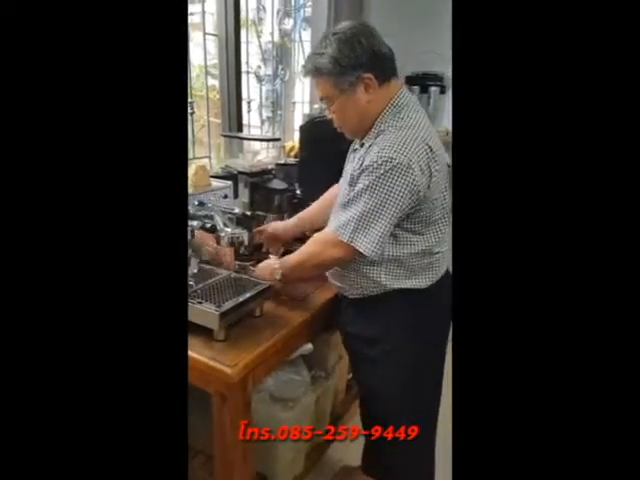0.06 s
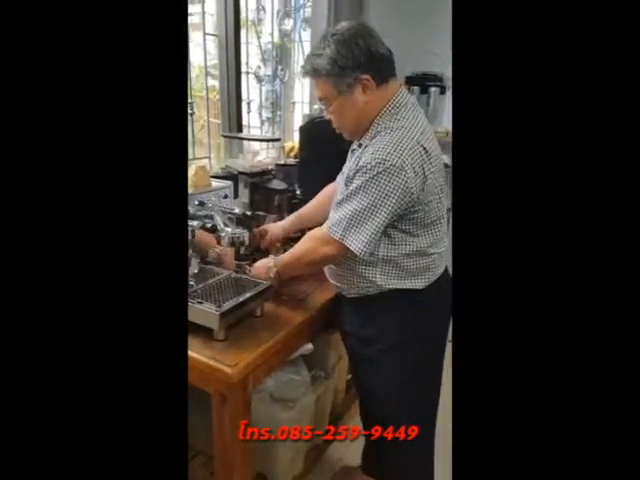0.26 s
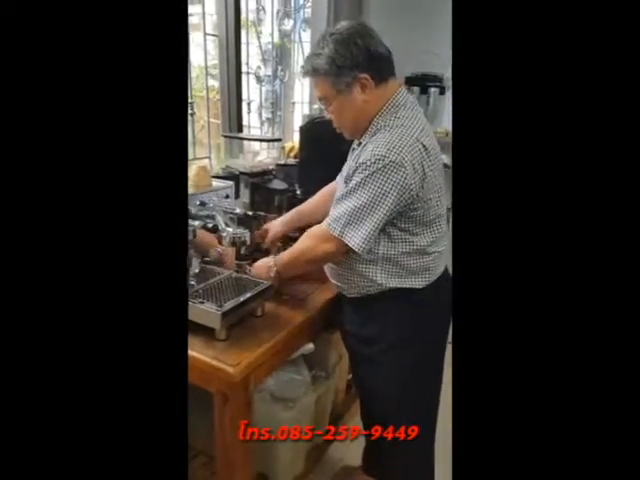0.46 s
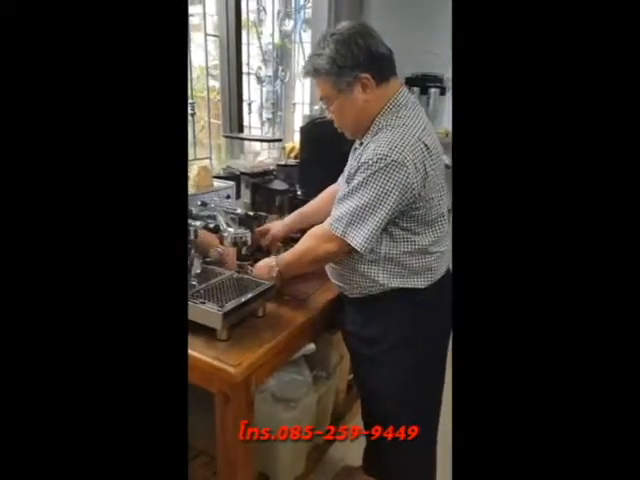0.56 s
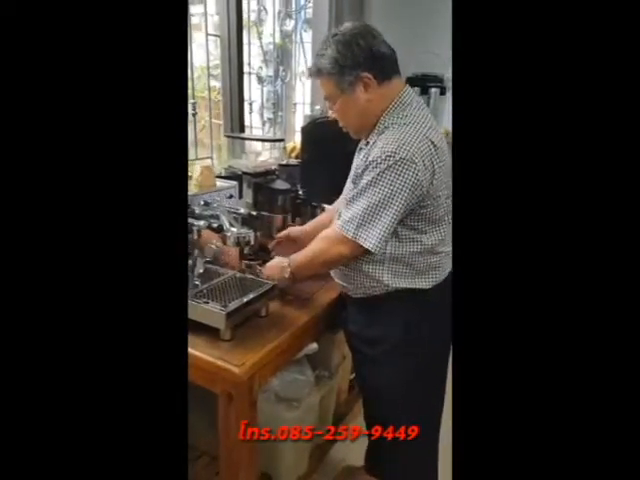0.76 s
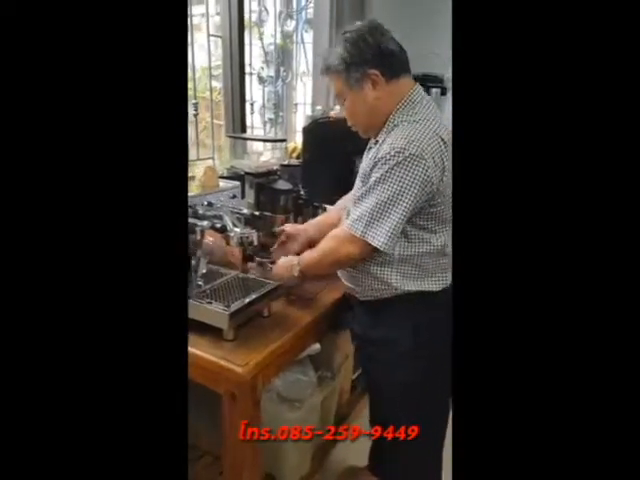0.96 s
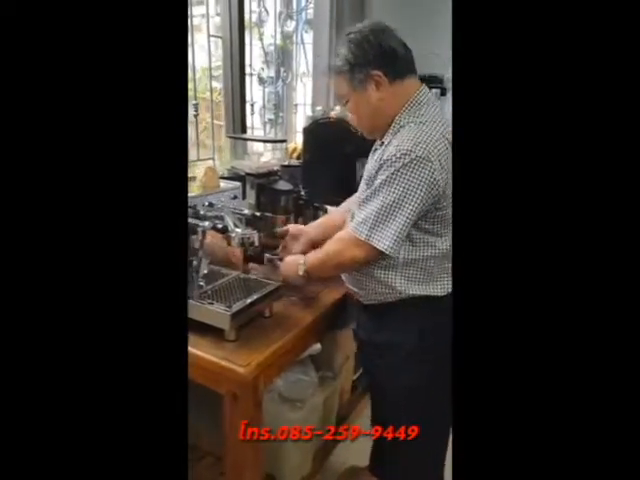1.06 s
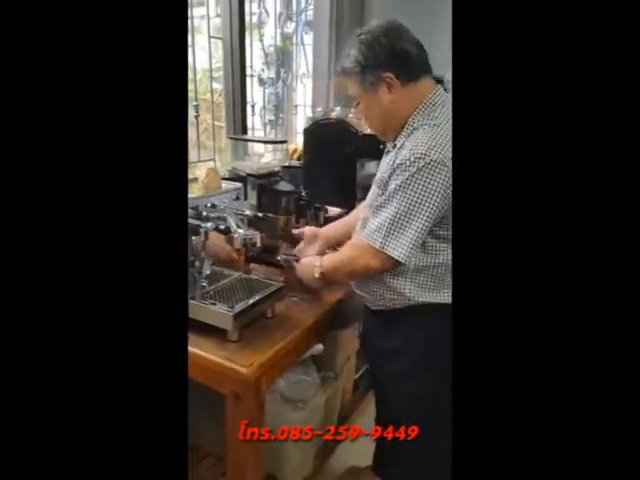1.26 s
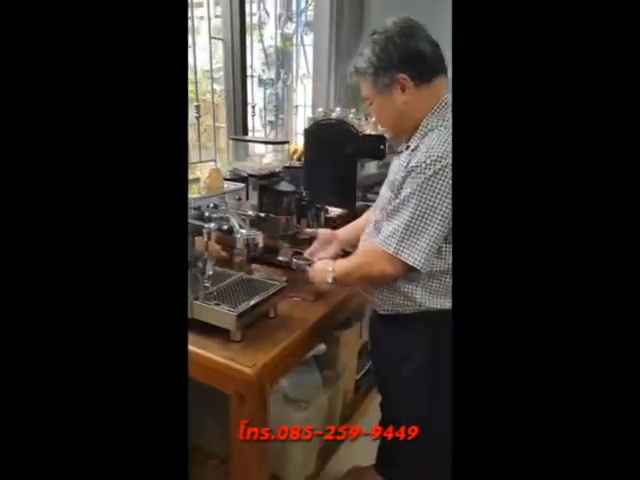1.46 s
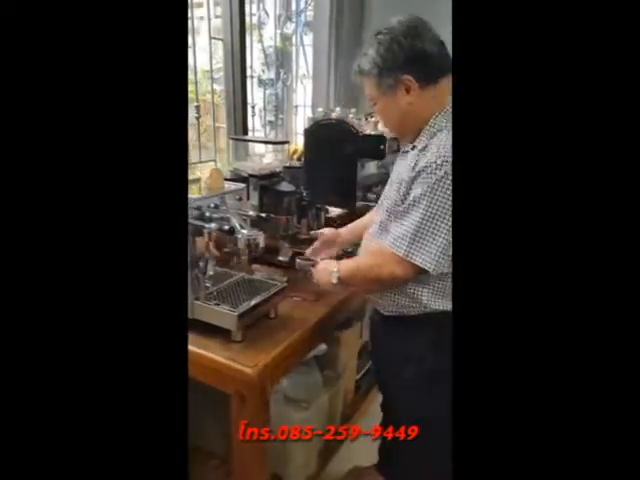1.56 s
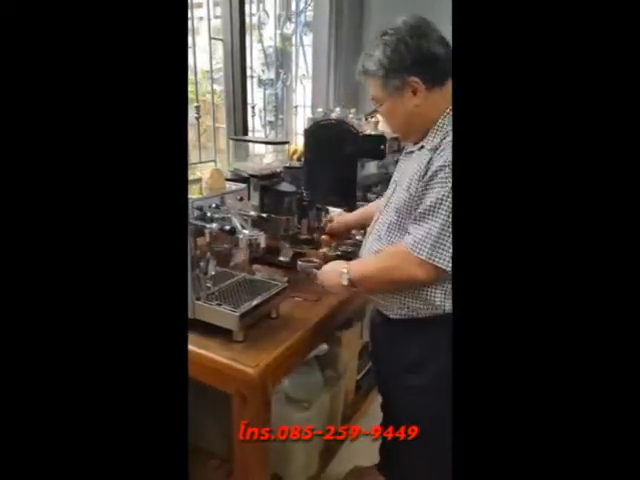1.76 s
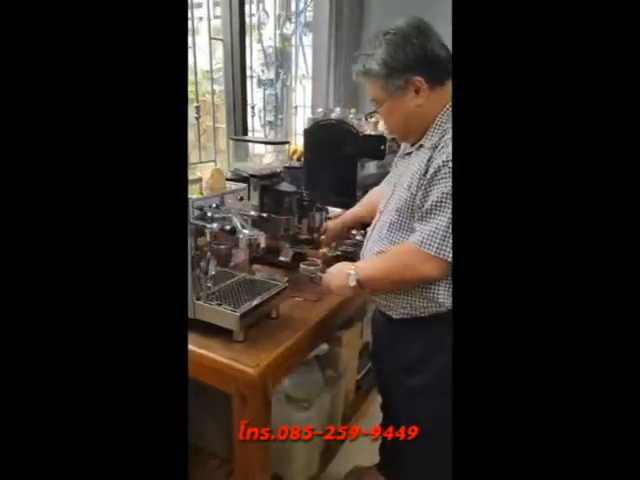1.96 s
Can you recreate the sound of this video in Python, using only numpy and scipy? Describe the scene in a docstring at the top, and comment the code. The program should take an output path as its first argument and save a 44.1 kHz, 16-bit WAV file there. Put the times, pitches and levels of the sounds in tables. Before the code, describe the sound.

Two sharp steel clacks from coffee gear being handled, then faint rubbing in a small room.

```python
"""Coffee equipment on a wooden counter

A stereo pair close to the counter in a small, hard room. Just to the left, steel gives a dull shove,
then two sharp clacks, the last led in by a brief rush of noise. Each contact thumps the counter and rings
the steel; one low tone lingers after the last. Faint rubbing strokes, a low hum and room noise remain."""
import sys
import numpy as np
from scipy import signal
from scipy.fft import rfft, irfft, next_fast_len
from scipy.io import wavfile
from scipy.ndimage import map_coordinates

SR = 44100
rng = np.random.default_rng(int(sys.argv[2]) if len(sys.argv) > 2 else 0)


def digitize_waveform(pressure):
    """Quantize a signal to 16-bit integers and store it at the path in sys.argv[1].

    Rows of a 2-D input are taken as channels; values are limited to [-1, 1].
    """
    field = np.atleast_2d(pressure).T
    bounded = np.clip(field, -1, 1)
    quanta = np.round(bounded * 32767).astype(np.int16)
    wavfile.write(sys.argv[1], SR, quanta)


N = 88200

# Resonances of the three struck steel parts. Each row: frequency in Hz, half width in Hz, lift in dB.
DULL_PART = [(360, 30, 4), (1080, 35, 4), (1276, 40, 5), (1880, 110, 4), (2277, 40, 4), (4200, 120, 3),
             (6800, 90, 6), (7500, 110, 4), (10950, 150, 7)]
HARD_PART = [(165, 30, 3), (463, 25, 5), (690, 40, 3), (930, 45, 5), (1505, 70, 7), (2250, 80, 5),
             (3660, 80, 6), (3927, 50, 4), (4036, 45, 4), (4793, 60, 4), (6190, 50, 5), (6900, 110, 6),
             (8560, 60, 4), (12320, 80, 4)]
BRIGHT_PART = [(333, 40, 6), (683, 30, 4), (1510, 50, 4), (1590, 45, 6), (2266, 35, 7), (2342, 35, 5),
               (4534, 70, 7), (5250, 110, 4), (6022, 55, 7), (7830, 130, 6), (8048, 50, 8), (8400, 100, 5),
               (9700, 60, 5), (12300, 250, 3)]
# Where a contact is coloured, in Hz: thump, body, clank, treble, top.
COLOUR_HZ = [130, 350, 1700, 4500, 12000]
# Contacts near the microphones. Each row: start in seconds, part, rise in seconds, gain in dB,
# crack over room tail in dB, then a gain in dB for each of the five colour bands.
CONTACTS = [(.2172, DULL_PART, 0.0021, -32.5, -2.5, 3.5, -0.5, 8, -10.5, -2.5),
            (.2335, DULL_PART, 0.002, -24, -1.5, 1.5, 4, 2, -3, -2),
            (.255, DULL_PART, 0.0027, -27.5, -2, 14.5, 4.5, -1, -5, -8),
            (.355, DULL_PART, .003, -33, 0.5, 2, 6.5, 2.5, -7.5, -11),
            (.4089, HARD_PART, .0004, -20, 1.5, -5.5, 0.5, 2.5, -1, -3),
            (.4135, HARD_PART, 0.00034, -21, 3.5, 6.5, -5, 0, 1, 3.5),
            (.421, HARD_PART, 0.0026, -30.5, 7, 9, 4, 1, -4, 2),
            (.5955, BRIGHT_PART, 0.0011, -18, 2.5, -3, 1.5, -0.5, 2.5, 2.5)]
THUMP_LAG_S = 0.0061  # the heavy counter answers after the steel


def knocks():
    """Each contact excites steel and counter with its own strength and colour; the bass builds last."""
    out = np.zeros((2, N))
    t = np.arange(2 * SR // 3) / SR
    for start, part, rise, db, crack_db, *colour in CONTACTS:
        blow = treble_resonances(clatter(t, crack_db) + early_echoes(t))
        blow = resonant(blow + ringing_modes(t, part), part)
        tint = list(zip(COLOUR_HZ, colour))
        blow = filtered(blow, lambda hz: amp(curve(tint, hz)))
        bass = filtered(blow, lambda hz: 1 / (1 + (hz / 260) ** 4))
        blow = blow - bass * np.exp(-(t / THUMP_LAG_S) ** 2)
        add(out, amp(db) * blow * np.clip(t / rise, 0, 1), start)
    return out


# Dense clatter of steel and wood. Each row: frequency in Hz, relative density in dB.
CLATTER_SPECTRUM = [(40, -34), (70, -10.5), (115, 4), (190, 1.5), (270, -0.5), (440, 3.5), (570, -5.5),
                    (720, 1.5), (1100, -5.5), (1550, -0.5), (2300, -1.5), (3100, -7), (4200, -2),
                    (6800, -7.5), (8200, -7), (10000, -7.5), (13500, -7.5)]
# The small room's tail. Each row: frequency in Hz, seconds to fall 60 dB.
ROOM_DECAY = [(100, 0.65), (400, .42), (1500, .42), (4500, 0.42), (8000, 0.36), (13000, .29)]
CRACK_T60_S = 0.054


def clatter(t, crack_db):
    """The short crack of the contact, and a dense ring that the room lets die band by band."""
    hz, times, bands = signal.stft(noise(CLATTER_SPECTRUM, size=len(t)), SR, nperseg=256)
    bands = bands * fade(times, curve(ROOM_DECAY, hz)[:, None])
    _, tail = signal.istft(bands, SR, nperseg=256)
    crack = amp(crack_db) * fade(t, CRACK_T60_S) * noise(CLATTER_SPECTRUM, size=len(t))
    return tail[:, :len(t)] + crack


# Low modes of counter and machine case. Each row: frequency in Hz, relative level in dB,
# seconds to fall 60 dB.
CASE_MODES = [(110.6, -19.5, .25), (154.7, -17, 0.32), (220, -21, 0.21), (328.2, -21, 0.15),
              (463, -14, 0.37), (673, -19, 0.25), (806, -24, .28)]


def ringing_modes(t, part, steel_db=-24, steel_t60_s=0.28, gain_db=3.5, rise_s=0.011):
    """Counter, case and struck steel ring at their modes, a little differently at every blow."""
    steel_modes = [(hz, steel_db, steel_t60_s) for hz, *_ in part]
    out = np.zeros((2, len(t)))
    for hz, db, t60 in [*CASE_MODES, *steel_modes]:
        mic_phase = stereo_angle(hz) * rng.normal(0, 0.5, (2, 1))
        phase = 2 * np.pi * (hz * t + rng.random()) + mic_phase
        out += amp(db + rng.normal(0, 1)) * np.sin(phase) * fade(t, t60)
    return amp(gain_db) * out * (1 - np.exp(-t / rise_s))


def treble_resonances(x, count=130, depth_db=2.6):
    """Countless lesser resonances ripple the treble, met differently at each contact."""
    ripple_hz = np.linspace(1425, 14250, count)
    ripple_db = depth_db * rng.standard_normal(count)
    return filtered(x, lambda hz: amp(np.interp(hz, ripple_hz, ripple_db, left=0)))


def early_echoes(t, count=30, spread_s=0.05, t60_s=0.085, gain_db=-5):
    """Single bounces off near surfaces reach each microphone at different times."""
    taps = np.zeros((2, len(t)))
    for mic in taps:
        mic[(rng.random(count) * spread_s * SR).astype(int)] = rng.standard_normal(count)
    echoes = unit(filtered(taps, lambda hz: amp(curve(CLATTER_SPECTRUM, hz))))
    echoes = echoes * np.sqrt(spread_s / t[-1])  # rms near 1 while the bounces arrive
    return amp(gain_db) * echoes * fade(t, t60_s)


def lead_in_swell(swell_db=24, swell_s=0.018, peak_db=-17):
    """A brief rush of noise swells into the last clack, then dies with its crack."""
    clack_s, part, *_ = CONTACTS[-1]
    t = np.arange(N) / SR - clack_s
    swell = amp(swell_db * np.minimum(t, 0) / swell_s)
    decay = fade(np.maximum(t, 0), CRACK_T60_S)
    return amp(peak_db) * swell * decay * unit(resonant(noise(CLATTER_SPECTRUM), part))


def lingering_tone(hz=276.2, db=-36, t60_s=1.185):
    """One lightly damped steel mode rings on after the last clack."""
    t = np.maximum(np.arange(N) / SR - CONTACTS[-1][0], 0)
    return amp(db) * np.sin(2 * np.pi * hz * t) * fade(t, t60_s)


# Body and hiss of the rubbing. Each row: frequency in Hz, relative density in dB.
RUB_SPECTRUM = [(100, -9), (300, -2.5), (700, -5.5), (950, -3.5), (1250, -11), (1750, -14), (2200, -17.5),
                (3000, -16), (4000, -30), (12000, -40)]
HISS_SPECTRUM = [(500, -34), (3000, -7), (6500, -0.5), (9000, -4), (14000, -8.5)]
# The body's hollow resonances. Each row: frequency in Hz, half width in Hz, lift in dB.
RUB_PEAKS = [(428, 14, 8.5), (659.5, 10.2, 13.5), (1720, 38, 9.5)]
# Strokes, faint at the microphones. Each row: middle and length in seconds, body and hiss levels in dB.
STROKES = [(0.945, 0.14, -61.5, -73), (1.024, 0.12, -72, -64.5), (1.125, 0.1, -61, -70),
           (1.275, 0.12, -61.5, -71.5), (1.44, 0.14, -62.5, -73.5), (1.598, .11, -63.5, -71.5),
           (1.755, 0.14, -63, -73.5), (1.916, 0.15, -63, -76.5)]


def rubbing():
    """Soft to-and-fro strokes: a hollow body with hiss on top."""
    t = np.arange(N) / SR
    body = unit(resonant(noise(RUB_SPECTRUM), RUB_PEAKS))
    hiss = noise(HISS_SPECTRUM)
    out = np.zeros((2, N))
    for middle, length, body_db, hiss_db in STROKES:
        swell = np.exp(-(2 * (t - middle) / length) ** 2)
        out += swell * (amp(body_db) * body + amp(hiss_db) * hiss)
    return out


# Room noise all around the pair. Each row: frequency in Hz, relative density in dB.
ROOM_SPECTRUM = [(20, -14), (45, 2), (110, -6), (250, -5), (500, -12.5), (1000, -22.5), (2000, -25.5),
                 (4000, -35), (14000, -39)]


def room_tone(noise_db=-65.5, hum_hz=57.8, hum_db=-63.5, waver_db=1.5, points=14):
    """Low room noise and a slowly wavering hum lie behind everything."""
    t = np.arange(N) / SR
    waver = map_coordinates(rng.standard_normal(points), [np.linspace(0, points - 1, N)], mode="nearest")
    hum = amp(hum_db + waver_db * waver) * np.sqrt(2) * np.sin(2 * np.pi * hum_hz * t)
    return amp(noise_db) * noise(ROOM_SPECTRUM) + hum


# How alike the two microphones hear the room. Each row: frequency in Hz, coherence from 0 to 1.
MIC_COHERENCE = [(60, .99), (190, .96), (350, .42), (700, .22), (1200, .02), (12000, .03)]


def stereo_angle(hz):
    """Radians between the channels: 0 when alike, a right angle when unrelated."""
    return np.arccos(np.clip(curve(MIC_COHERENCE, hz), -1, 1))


def noise(spectrum, size=N):
    """Stereo noise of rms 1, alike in the bass and unrelated in the treble."""
    def mid_side_gains(hz):
        turn = stereo_angle(hz) / 2
        return amp(curve(spectrum, hz)) * [np.cos(turn), np.sin(turn)]
    mid, side = filtered(rng.standard_normal((2, size)), mid_side_gains)
    return unit(np.array([mid + side, mid - side]))


def resonant(x, peaks):
    """Lift a sound at each resonance."""
    return filtered(x, lambda f: amp(sum(db / (1 + ((f - hz) / width) ** 2) for hz, width, db in peaks)))


def filtered(x, response):
    """Shape x by a gain that depends on frequency."""
    n = x.shape[-1]
    padded = next_fast_len(n + 8192)
    return irfft(rfft(x, padded) * response(np.fft.rfftfreq(padded, 1 / SR)), padded)[..., :n]


def curve(points, hz):
    """Interpolate (Hz, value) points on a log axis."""
    freqs, values = np.transpose(points)
    return np.interp(np.log(hz + 1), np.log(freqs + 1), values)


def amp(db):
    """Decibels to gain."""
    return 10 ** (np.asarray(db) / 20)


def unit(x):
    """Scale to rms 1."""
    return x / np.sqrt(np.mean(x ** 2) + 1e-20)


def fade(t, t60):
    """Fall 60 dB every t60 seconds."""
    return np.exp(-np.log(1000) * t / t60)


def add(out, x, start_s):
    """Mix x into out from start_s."""
    i = round(start_s * SR)
    out[:, i:i + x.shape[1]] += x[:, :N - i]


# The equipment's place before the pair. Each row: frequency in Hz, left over right in dB.
LEFT_BIAS = [(100, 0.2), (500, 1), (1600, -0.3), (5000, 2.5), (13000, 1.2)]


def scene():
    """The equipment stands a little to the left; the quiet sounds fill the room."""
    sides = np.array([[0.5], [-0.5]])
    equipment = filtered(knocks() + lead_in_swell(), lambda hz: amp(curve(LEFT_BIAS, hz) * sides))
    return equipment + lingering_tone() + rubbing() + room_tone()


def record(dry):
    """The recorder rounds off the highest peaks and cuts the top of the treble steeply."""
    ceiling, top_hz = 0.85, 14250
    rounded = dry / (1 + np.abs(dry / ceiling) ** 4) ** (1 / 4)
    return filtered(rounded, lambda hz: 1 / (1 + (hz / top_hz) ** 160))


dry = scene()
out = record(dry)
digitize_waveform(out)
```